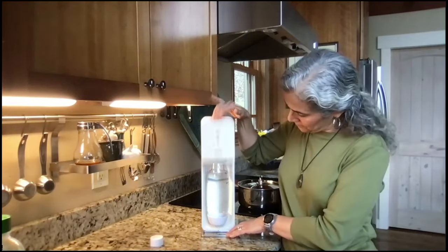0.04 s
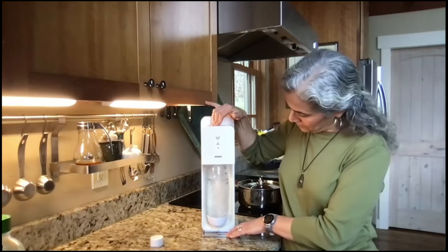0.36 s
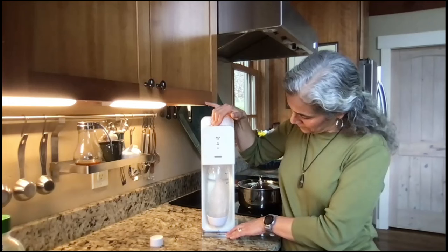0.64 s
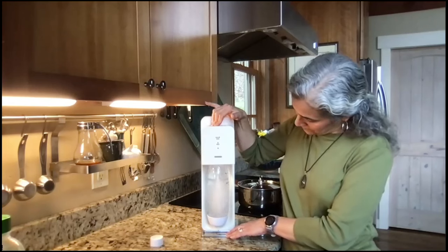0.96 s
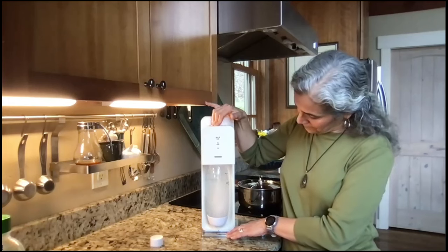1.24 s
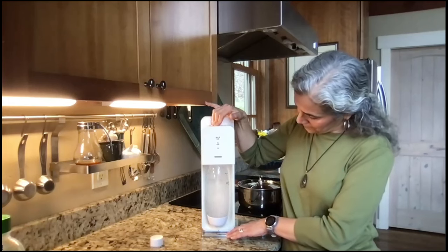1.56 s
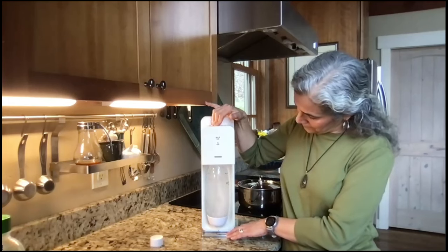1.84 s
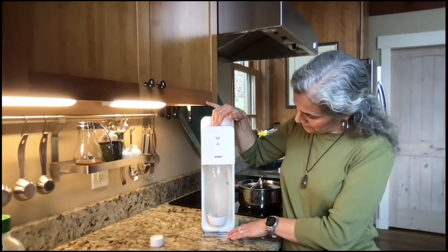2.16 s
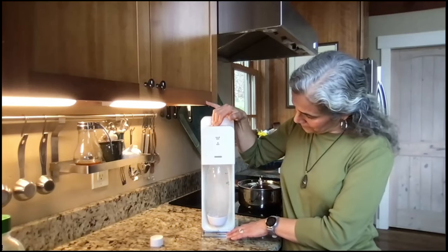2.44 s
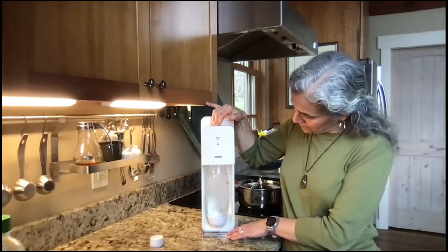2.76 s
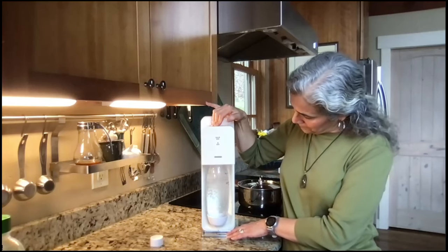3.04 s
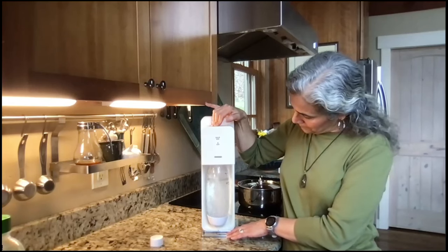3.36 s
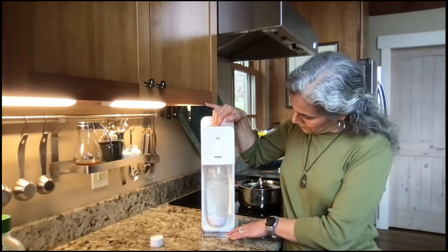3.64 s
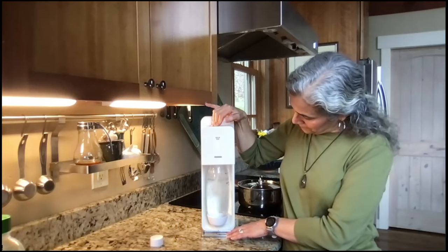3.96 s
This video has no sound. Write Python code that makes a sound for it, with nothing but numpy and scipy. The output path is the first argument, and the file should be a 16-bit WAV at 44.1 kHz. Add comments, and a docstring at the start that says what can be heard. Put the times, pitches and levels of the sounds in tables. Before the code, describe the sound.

A soda maker spits and thumps, then forces gas through a bottle of water in gulps and steady bubbling. The flow fades, and the valve releases a loud hiss with a falling whistle in a slightly echoing kitchen.

```python
"""Gas from a soda maker bubbles through a bottle of water, each bubble ringing as a damped oscillator.
The valve spits and a blast thumps into the bottle, exciting the machine's modes. Big gulps give way to
a steady churn whose pitch climbs as pressure builds and the bubbles shrink. The flow dies away, and the
relief valve vents with a loud turbulent hiss and a falling whistle. The kitchen reverberates."""
import sys
import numpy as np
from scipy import signal
from scipy.fft import rfft, irfft, next_fast_len
from scipy.io import wavfile
from scipy.ndimage import map_coordinates

SR = 44100
rng = np.random.default_rng(int(sys.argv[2]) if len(sys.argv) > 2 else 0)


def store_wav(level_fs):
    """Save 16-bit WAV to argv[1]."""
    pcm = np.round(np.clip(np.atleast_2d(level_fs), -1, 1) * 32767)
    wavfile.write(sys.argv[1], SR, pcm.T.astype(np.int16))


N = 176400


def amp(db):
    """Amplitude ratio of a level in decibels."""
    return 10 ** (np.asarray(db) / 20)


def unit(x):
    """The signal normalised to rms 1."""
    return x / np.sqrt(np.mean(x ** 2) + 1e-20)


def clock():
    """Time of every sample in seconds."""
    return np.arange(N) / SR


def curve(points):
    """Linear interpolation of (seconds, value) points at every sample."""
    return np.interp(clock(), *np.transpose(points))


def along(points, hz):
    """Interpolation of (Hz, value) points on a logarithmic frequency axis."""
    freqs, values = np.transpose(points)
    return np.interp(np.log(hz + 1), np.log(freqs + 1), values)


def wobble(per_s):
    """Smooth random modulation: a spline through per_s Gaussian values a second."""
    knots = rng.standard_normal(int(N * per_s / SR) + 4)
    return map_coordinates(knots, [np.arange(N) * per_s / SR])


def filtered(x, response):
    """Linear filtering: the spectrum is multiplied by response(hz)."""
    size = next_fast_len(N + SR // 2)
    return irfft(rfft(x, size) * response(np.fft.rfftfreq(size, 1 / SR)), size)[:N]


def noise(spectrum):
    """Gaussian noise of rms 1, shaped by (Hz, dB) points."""
    return unit(filtered(rng.standard_normal(N), lambda hz: amp(along(spectrum, hz))))


def burst(start, rise, hold, t60):
    """Envelope in seconds: a linear rise, then exponential decay from start + hold."""
    age = clock() - start
    return np.clip(age / rise, 0, 1) * amp(-60 * np.maximum(age - hold, 0) / t60)


def resonances(peaks, hz):
    """Gain of narrow resonances, each a bell-shaped boost in decibels."""
    return amp(sum(db / (1 + (2 * (hz - centre) / width) ** 2) for centre, width, db in peaks))


# Background spectrum. Each row: frequency in Hz, relative level in dB.
AMBIENT_SPECTRUM = [(30, -4), (2000, 1), (5000, -8)]


def ambience():
    """Stationary noise forms a faint floor under the scene."""
    return amp(-82) * noise(AMBIENT_SPECTRUM)


# Reverberation of the kitchen. Each row: frequency in Hz, time to decay by 60 dB in seconds.
ROOM_T60 = [(100, 0.43), (1000, 0.57), (5000, 0.35), (10000, 0.51), (15000, 0.25)]


def kitchen_reverb(x):
    """Reverberation: convolution with a diffuse tail in which each frequency decays at its own rate."""
    hz, t, spectra = signal.stft(rng.standard_normal(SR // 2), SR, nperseg=256)
    decay = amp(-60 * t / along(ROOM_T60, hz)[:, None])
    tail = signal.istft(spectra * decay, SR, nperseg=256)[1]
    delayed = np.pad(x, (SR // 250, 0))  # 4 ms
    return signal.fftconvolve(delayed, tail / np.linalg.norm(tail))[:N]


# Impacts of spray and of the housing. Each row: start in seconds, level in dB.
SPATTER_HITS = [(0.458, -42), (0.546, -35), (0.629, -34), (0.933, -29.5), (0.945, -35.5), (1.4325, -39),
                (1.559, -44), (1.891, -42), (2.228, -35)]
KNOCK_HITS = [(2.347, -44), (2.527, -48), (2.778, -52.5), (2.916, -53), (3.073, -37)]
# Their spectra. Each row: frequency in Hz, relative level in dB.
SPATTER_SPECTRUM = [(200, -25), (700, -6), (1300, -16), (2000, 2), (4200, 3), (5700, -2.5), (6800, -18),
                    (11800, -25.5), (15000, -59)]
KNOCK_SPECTRUM = [(40, -34), (200, -17.5), (340, 0), (600, -14), (1400, -8), (3000, -12), (12000, -37)]


def impacts():
    """Impacts radiate broadband transients: spray strikes the bottle and the pressed housing knocks."""
    spatters = sum(amp(db) * burst(start, .0012, .011, .051) for start, db in SPATTER_HITS)
    knocks = sum(amp(db) * burst(start, .002, .0093, .099) for start, db in KNOCK_HITS)
    return spatters * noise(SPATTER_SPECTRUM) + knocks * noise(KNOCK_SPECTRUM)


# Partials of the squeak. Each row: harmonic number, level in dB.
SQUEAK_HARMONICS = [(2, -42), (3, -40), (4, -44), (5, -49), (6, -52)]


def nozzle_squeak():
    """Gas squeezing through the nozzle sounds a rough harmonic series with a missing fundamental."""
    fundamental_hz = 2087 + 40 * wobble(500)
    phase = 2 * np.pi * np.cumsum(fundamental_hz) / SR
    tone = sum(amp(db) * np.sin(round(k) * phase) for k, db in SQUEAK_HARMONICS)
    return tone * burst(start=.839, rise=.009, hold=.019, t60=.083)


# Spectra of seeping and of spitting gas. Each row: frequency in Hz, relative level in dB.
SEEP_SPECTRUM = [(1100, -28.5), (1800, 2), (4500, 0), (7000, -11)]
WET_SPIT_SPECTRUM = [(300, -23), (1100, 1), (1600, -1), (2400, 1), (3300, 0.5), (4400, -5.5), (5600, -6.5),
                     (12000, -23)]
# Wet spits. Each row: start, hold and 60 dB decay time in seconds, level in dB.
WET_SPITS = [(3.062, 0.011, .05, -29.5), (3.084, .01, 1, -36), (3.916, 0.011, .3, -34)]


def relief_leaks():
    """Brief flows make bursts of noise: the relief valve seeps before it lifts, then spits wet gas."""
    seep = amp(-58.5) * burst(start=2.775, rise=.059, hold=.14, t60=.05) * noise(SEEP_SPECTRUM)
    spits = sum(amp(db) * burst(start, .0037, hold, t60) for start, hold, t60, db in WET_SPITS)
    return seep + spits * noise(WET_SPIT_SPECTRUM)


# Envelope of the hiss. Each row: time in seconds, level in dB.
HISS_LEVEL = [(2.925, -89), (2.937, -37), (3.05, -33), (3.075, -31.5), (3.2, -31.5), (3.8, -30.5),
              (4.0, -31)]
# Its spectrum once settled. Each row: frequency in Hz, relative level in dB.
HISS_SPECTRUM = [(40, -46), (130, -21.5), (240, -20), (355, 8.5), (470, -3.5), (575, -6.5), (820, -4),
                 (980, 7.5), (1220, 2.5), (1370, 8), (1540, 2), (1800, 5), (2080, 14), (2200, 15),
                 (2400, 9), (2650, -5.5), (3050, -3.5), (4000, -8.5), (4900, -7), (6750, -3), (7400, 2),
                 (8220, -1.5), (8580, 5.5), (9200, 1.5), (11000, -4), (13500, -7.5), (15000, -24)]
# Settled resonances of the vent passage. Each row: centre in Hz, width in Hz, boost in dB.
VENT_RESONANCES = [(5590, 130, 11.5), (5900, 90, 7), (7040, 170, 6), (7750, 160, 2.5), (8500, 210, 5)]
WIDE_OPEN_S, SHARP_FRACTION, SETTLE_S = 3.056, .07, .2


def relief_hiss():
    """Turbulence excites the vent's resonances, which start sharp and sink once the valve is wide open."""
    ringing = unit(filtered(noise(HISS_SPECTRUM), lambda hz: resonances(VENT_RESONANCES, hz)))
    open_s = np.maximum(clock() - WIDE_OPEN_S, 0)
    position = np.cumsum(1 + SHARP_FRACTION * np.exp(-open_s / SETTLE_S))
    hiss = map_coordinates(ringing, [position - position[-1] + N - 1], order=5)  # faster is sharper
    return amp(curve(HISS_LEVEL) + .85 * wobble(50)) * hiss


# Pitch of the whistle. Each row: time in seconds, frequency in Hz.
WHISTLE_HZ = [(2.927, 2450), (2.938, 2637), (3.018, 2612), (3.053, 2505), (3.057, 2328), (3.18, 2242),
              (3.275, 2233), (3.288, 2199), (3.388, 2191), (3.414, 2250), (3.432, 2185), (3.64, 2185),
              (3.67, 2168), (4.0, 2155)]
# Envelopes of its fundamental and its octave. Each row: time in seconds, rms level in dB.
FUNDAMENTAL_RMS = [(2.926, -57), (2.937, -23.5), (2.952, -23), (2.966, -31), (2.982, -19.5), (3.014, -24),
                   (3.024, -28), (3.048, -18), (3.054, -39), (3.076, -27), (3.28, -29.5), (3.31, -22.5),
                   (3.39, -26.5), (3.44, -21.5), (3.51, -23), (3.795, -21), (3.815, -32), (3.87, -20.5),
                   (3.93, -18), (4.0, -21)]
OCTAVE_RMS = [(2.95, -53.5), (3.02, -45), (3.058, -46.5), (3.27, -50), (3.31, -47.5), (3.53, -49),
              (3.71, -44), (3.93, -39), (4.0, -36)]
# Its upper partials. Each row: harmonic number, level in dB relative to the fundamental.
WHISTLE_HARMONICS = [(3, -36), (4, -38)]


def relief_whistle():
    """A flow-driven tone, high while the valve is barely open, breaks lower and falters as it widens."""
    t = clock()
    hz = curve(WHISTLE_HZ) + 6 * wobble(60) + 13 * wobble(600)
    phase = 2 * np.pi * np.cumsum(hz) / SR
    tone = np.sin(phase) + sum(amp(db) * np.sin(round(k) * phase) for k, db in WHISTLE_HARMONICS)
    octave = amp(curve(OCTAVE_RMS) + 3.5 * wobble(160)) * np.sin(2 * phase)
    whistle = np.sqrt(2) * (amp(curve(FUNDAMENTAL_RMS)) * tone + octave)
    falter_db = 2.6 * np.maximum(wobble(110), 0) ** 2 * (t > WIDE_OPEN_S)
    flutter_db = 1.1 * wobble(70) + .5 * wobble(450)
    return whistle * amp(flutter_db - falter_db) * (t > FUNDAMENTAL_RMS[0][0])


# Spits from the nozzle. Each row: start in seconds, hold in seconds, level in dB.
NOZZLE_SPITS = [(0.0582, 0.0055, -21), (0.0652, 0.0035, -16), (0.071, 0.0063, -30)]
# Spectra of the spits and the blast. Each row: frequency in Hz, relative level in dB.
SPIT_SPECTRUM = [(120, -44.5), (200, -9.5), (1310, -3.5), (4010, -6), (4810, 1.5), (6190, -8), (8880, -2.5),
                 (12500, -8.5), (15000, -29.5)]
BLAST_SPECTRUM = [(30, -37.5), (100, -10.5), (270, -2), (370, 5.5), (600, -3.5), (860, -8), (1170, 1),
                  (1330, -8.5), (1950, -8.5), (2700, -9.5), (6200, -17), (10000, -16.5), (13200, -29.5),
                  (15000, -39)]
# Modes of machine and bottle. Each row: frequency in Hz, relative level in dB, 60 dB decay in seconds.
BODY_MODES = [(145, -30.5, 0.25), (172.2, -18.5, 0.15), (224, -24, 0.18), (375.6, -14.5, 0.11),
              (498, -24.5, .08), (572.4, -25.5, 0.17), (713, -32.5, 0.12), (1106, -31.5, 0.064)]
BLAST_S = .0808


def blast():
    """Impulsive excitation: the valve spits, then the full charge hits the water and rings the modes."""
    spits = sum(amp(db) * burst(start, .003, hold, .017) for start, hold, db in NOZZLE_SPITS)
    spitting = spits * noise(SPIT_SPECTRUM)
    thump = amp(-9) * noise(BLAST_SPECTRUM) * burst(BLAST_S, rise=.0014, hold=.011, t60=.035)
    age = np.maximum(clock() - BLAST_S, 0)
    ring = sum(amp(db - 60 * age / t60) * np.sin(2 * np.pi * (hz * age + rng.random()))
               for hz, db, t60 in BODY_MODES)
    build_up = 1 - np.exp(-age / .01)
    return spitting + thump + amp(5.5) * ring * build_up


# Treble resonances of the bottle. Each row: centre in Hz, width in Hz, boost in dB.
BOTTLE_RESONANCES = [(8590, 190, 9.5), (8970, 160, 6), (10800, 140, 0.5), (11400, 230, 5.5),
                     (11770, 260, 7.5), (13430, 150, 6)]


def bottle(x):
    """The bottle acts as a resonator, reinforcing narrow treble bands."""
    return filtered(x, lambda hz: resonances(BOTTLE_RESONANCES, hz))


# Transmission through the bottle wall. Each row: frequency in Hz, relative gain in dB.
WALL_GAIN = [(150, -20.5), (400, 0), (660, 26.5), (880, -4), (1170, 8), (1290, 2.5), (1750, 2), (2400, -1),
             (3750, 2.5), (5200, -7), (7400, -21), (11600, -24), (14000, -39.5)]
RISE_PER_DECAY, LOWEST_BUBBLE_HZ = .025, 900


def bubble_cloud(centre_hz, per_s, log_spread, decay_cycles, scatter_db, ring_samples):
    """Bubble resonance: damped, rising sinusoids add up and pass through the wall; the result has rms 1."""
    count = int(per_s * N / SR)
    timing, tuning, loudness = np.random.default_rng(rng.integers(1 << 30)).standard_normal((count, 3)).T
    starts = (np.arange(count) * N / count + timing * SR / per_s).astype(int) % N
    hz = np.clip(centre_hz[starts] * np.exp(log_spread * tuning), 500, 16000)
    life = np.linspace(0, 4, 40000)  # in decay time constants, each decay_cycles periods long
    phase = 2 * np.pi * decay_cycles * life * (1 + RISE_PER_DECAY * life / 2)
    shape = np.sin(phase) * np.exp(-life) * (1 - np.exp(-10 * life))
    age = np.arange(ring_samples)
    taper = 1 - (age / ring_samples) ** 2
    rings = np.interp(hz[:, None] * age / SR / decay_cycles, life, shape, right=0) * taper
    strength = amp(scatter_db * np.clip(loudness, -2, 2)) * np.sqrt(hz) * (hz > LOWEST_BUBBLE_HZ)
    cloud = np.bincount((starts[:, None] + age).ravel(), (strength[:, None] * rings).ravel(), N)[:N]
    return unit(filtered(cloud, lambda f: amp(along(WALL_GAIN, f))))


# Envelope of the fizz. Each row: time in seconds, level in dB.
FIZZ_LEVEL = [(.03, -87), (.3, -61.5), (.6, -55.5), (1.1, -65), (1.7, -59), (2.05, -75), (2.55, -62.5),
              (2.7, -70)]


def fizz():
    """Resonant frequency varies inversely with radius, so the tiniest bubbles ping in the high treble."""
    pings = bubble_cloud(centre_hz=np.full(N, 8500), per_s=1800, log_spread=.2,
                         decay_cycles=30, scatter_db=6.5, ring_samples=500)
    return amp(curve(FIZZ_LEVEL)) * pings


# Envelope of the throb. Each row: time in seconds, level in dB.
THROB_LEVEL = [(.1, -61.5), (.6, -60), (1.2, -62.5), (1.45, -76), (1.7, -62), (2.08, -85), (2.32, -65),
               (2.56, -64), (2.8, -95)]
# Its spectrum. Each row: frequency in Hz, relative level in dB.
THROB_SPECTRUM = [(30, -28), (68, -19.5), (98, 1), (113, -10.5), (135, -9.5), (200, -29)]


def throb():
    """The water throbs as narrow-band bass noise under slow amplitude modulation."""
    return amp(curve(THROB_LEVEL)) * noise(THROB_SPECTRUM)


# Single large bubbles. Each row: start in seconds, initial frequency in Hz, level in dB.
LARGE_BUBBLES = [(0.271, 1142, -27), (.39, 1253, -32), (.408, 1930, -27.5), (0.473, 1373, -21.5),
                 (0.484, 2537, -24), (0.486, 1860, -23), (0.489, 1510, -25.5), (0.51, 1534, -26),
                 (0.514, 1940, -29), (.549, 2400, -30.5), (0.553, 1504, -26), (.603, 1893, -24.5),
                 (.698, 1910, -27.5), (0.94, 3007, -20.5)]
GLUG_RISE_PER_S = 3  # in multiples of the initial frequency


def glugs():
    """The largest bubbles oscillate freely, rising in pitch as they near the surface."""
    rings = np.zeros(N)
    for start, hz, db in LARGE_BUBBLES:
        age = clock() - start
        phase = 2 * np.pi * hz * age * (1 + GLUG_RISE_PER_S * age / 2)
        rings += amp(db) * burst(start, rise=.005, hold=.01, t60=.04) * np.sin(phase)
    return rings


# Gulps of gas. Each row: start in seconds, length in seconds, level in dB, centre pitch in Hz.
GAS_GULPS = [(0.15, 0.059, -31, 1353), (0.218, 0.027, -38, 1406), (.257, 0.029, -30, 1470),
             (0.292, 0.034, -35.5, 1488), (0.38, 0.041, -32, 1628), (0.444, 0.027, -31, 1510),
             (.473, .028, -30.5, 1734), (0.54, 0.027, -32.5, 2044), (0.575, 0.041, -33, 2116),
             (0.665, 0.053, -35, 1975), (0.731, .022, -34.5, 2206), (0.832, 0.026, -36, 1883)]
# Spectrum of their splashes. Each row: frequency in Hz, relative level in dB.
SPLASH_SPECTRUM = [(200, -27), (330, -9.5), (690, -6.5), (1200, 0.5), (2600, -14), (5700, -9.5),
                   (7300, -33), (11800, -31.5), (14000, -46.5)]


def gulps():
    """Each gulp of gas makes a broadband splash and breaks into a cluster of large resonating bubbles."""
    centre_hz = curve([(start + length / 2, hz) for start, length, _, hz in GAS_GULPS])
    envelope = sum(amp(db) * burst(start, .0056, length, .059) for start, length, db, _ in GAS_GULPS)
    splash = amp(-10 + 3 * wobble(110.56)) * noise(SPLASH_SPECTRUM)
    cluster = bubble_cloud(centre_hz, per_s=650, log_spread=.4,
                           decay_cycles=22, scatter_db=3, ring_samples=1500)
    return envelope * (splash + cluster)


# Envelope of the jet. Each row: time in seconds, relative level in dB.
JET_LEVEL = [(.02, -77), (.035, -44.5), (.07, -61), (.16, -39), (.35, -40.5), (.53, -40), (.62, -33),
             (.81, -41), (.92, -36), (1.03, -31), (1.28, -30), (1.72, -31), (2.03, -34), (2.27, -32.5),
             (2.44, -38), (2.55, -38), (2.62, -53.5), (2.71, -53), (2.76, -64.5), (2.9, -84.5)]
# Pitch of its bubbles. Each row: time in seconds, centre frequency in Hz.
JET_BUBBLE_HZ = [(.6, 2136), (1.2, 2332), (2.0, 3078), (2.6, 2917)]
# Spectrum of the churning foam. Each row: frequency in Hz, relative level in dB.
FOAM_SPECTRUM = [(150, -58), (485, -13.5), (550, -31), (659, -5), (880, -23.5), (1150, -1.5), (1410, -7.5),
                 (1780, -30), (1950, -11.5), (3010, -1.5), (3730, -6.5), (5970, -18), (7150, -36),
                 (11400, -32.5), (15000, -47)]


def jet():
    """The steady jet churns foam and sheds bubbles, which resonate higher as pressure shrinks them."""
    cloud = bubble_cloud(curve(JET_BUBBLE_HZ), per_s=1800, log_spread=.4426,
                         decay_cycles=23, scatter_db=4, ring_samples=640)
    foam = noise(FOAM_SPECTRUM) * amp(1.4 * wobble(120))
    envelope = amp(curve(JET_LEVEL) + 1.08 * wobble(39.63))
    return envelope * (amp(-4) * cloud + amp(-8.5) * foam)


def scene():
    """Superposition of the machine's direct sound, its reverberation and the background."""
    water = bottle(gulps() + jet() + fizz() + throb() + impacts())
    machine = water + glugs() + blast() + nozzle_squeak()
    machine += relief_whistle() + relief_hiss() + relief_leaks()
    return (machine + amp(-10) * kitchen_reverb(machine) + ambience())[None]


# Treble roll-off. Each row: frequency in Hz, gain in dB.
TREBLE_GAIN = [(12500, 0), (14000, -1.5), (15100, -9.5)]
SATURATION_AMPLITUDE, BAND_LIMIT_HZ = .55, 15100


def record(dry):
    """Soft saturation rounds the highest peaks; a low-pass filter dulls the treble and limits the band."""
    rounded = dry[0] / (1 + np.abs(dry[0] / SATURATION_AMPLITUDE) ** 6) ** (1 / 6)
    return filtered(rounded, lambda hz: amp(along(TREBLE_GAIN, hz)) * (hz < BAND_LIMIT_HZ))[None]


dry = scene()
out = record(dry)
store_wav(out)
```